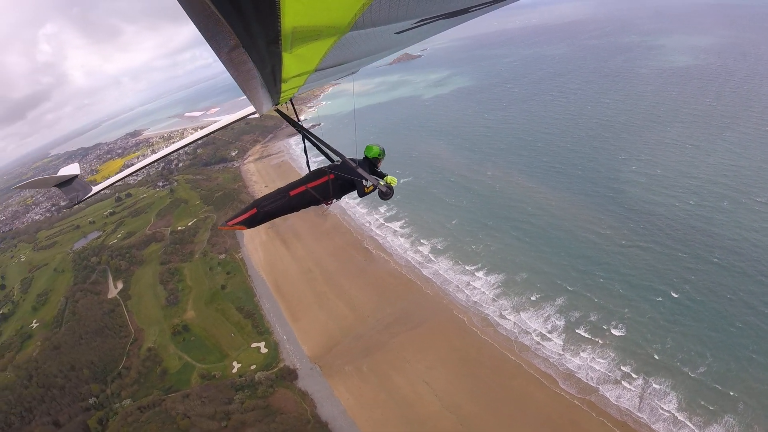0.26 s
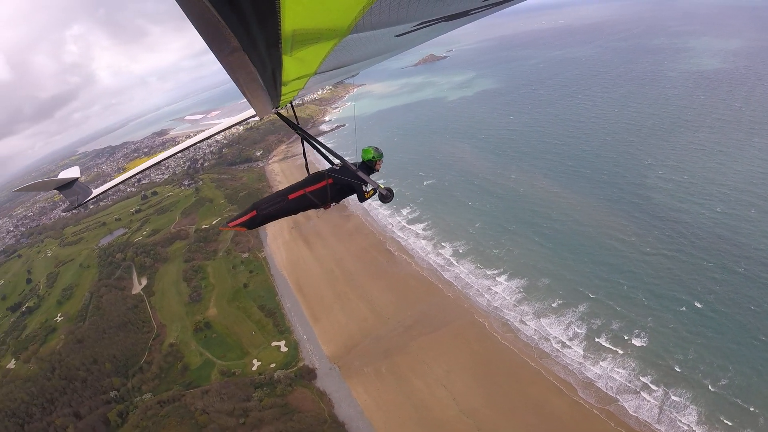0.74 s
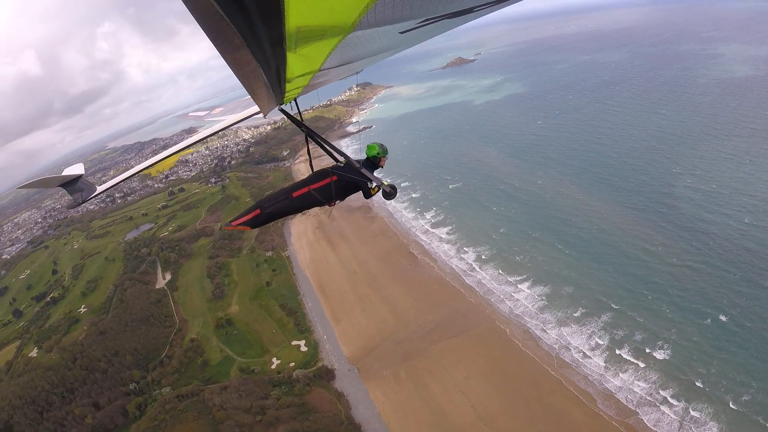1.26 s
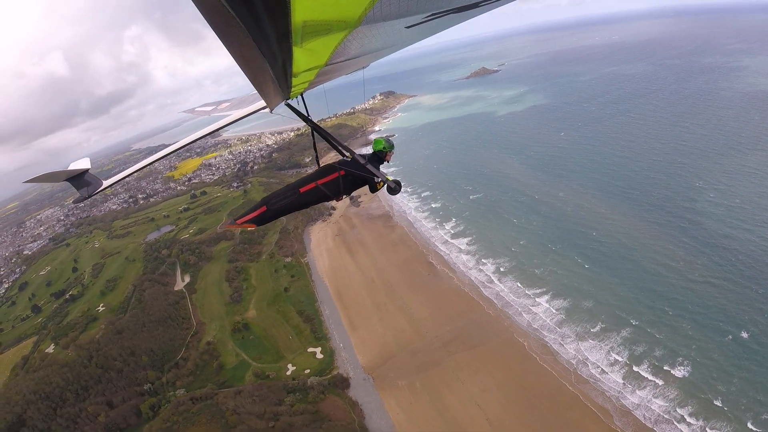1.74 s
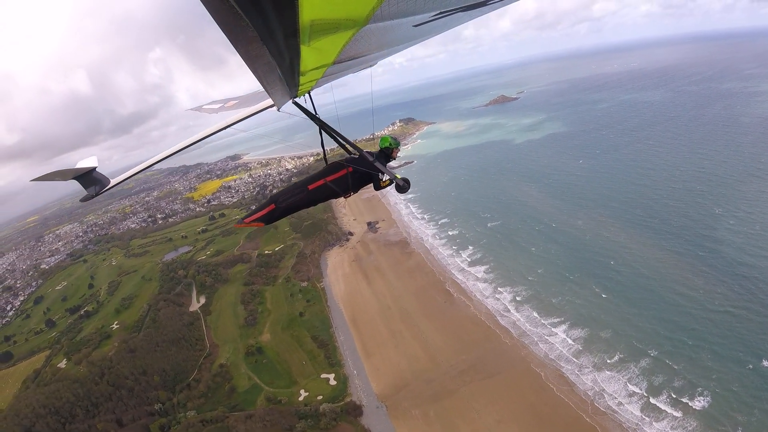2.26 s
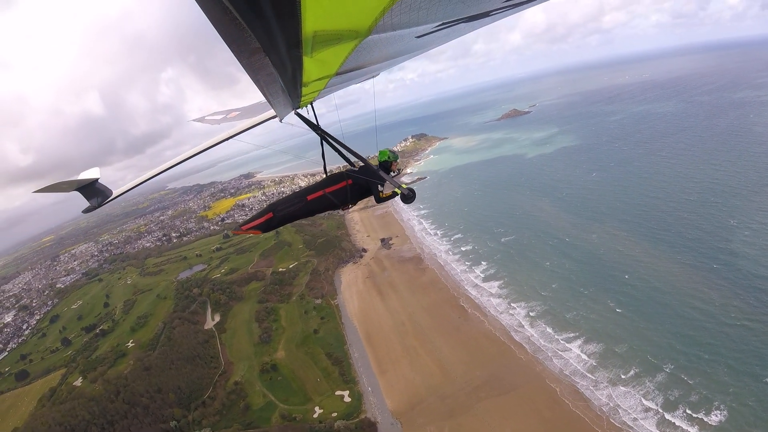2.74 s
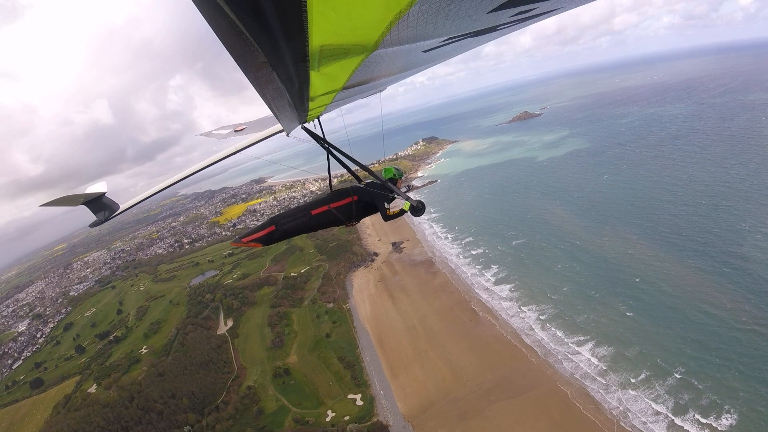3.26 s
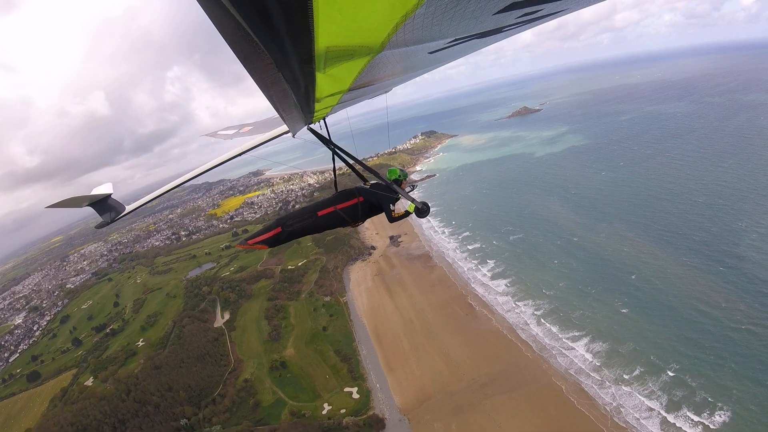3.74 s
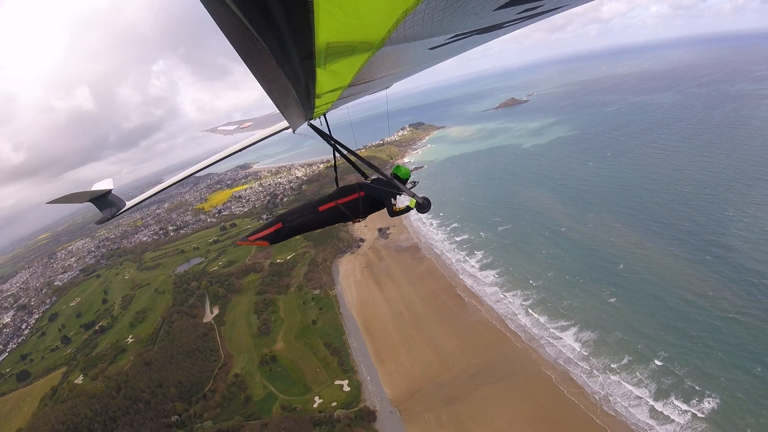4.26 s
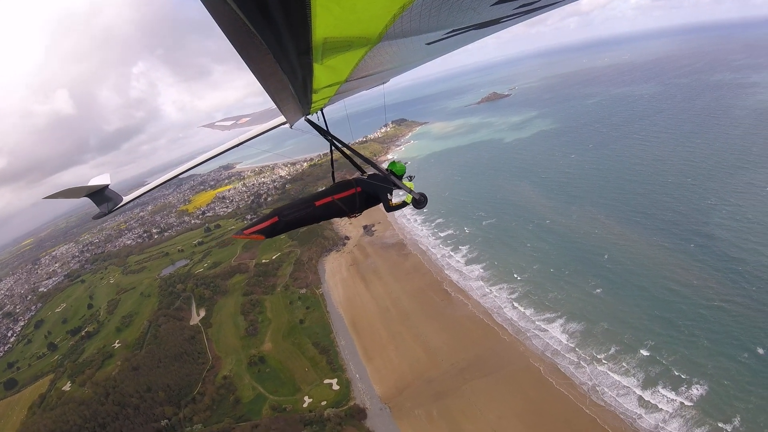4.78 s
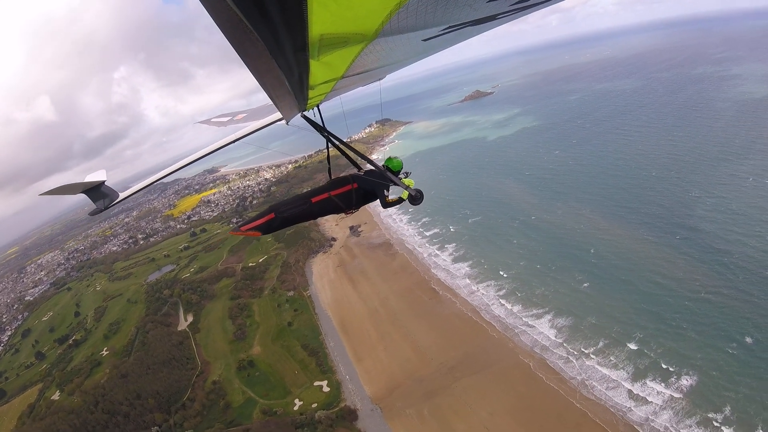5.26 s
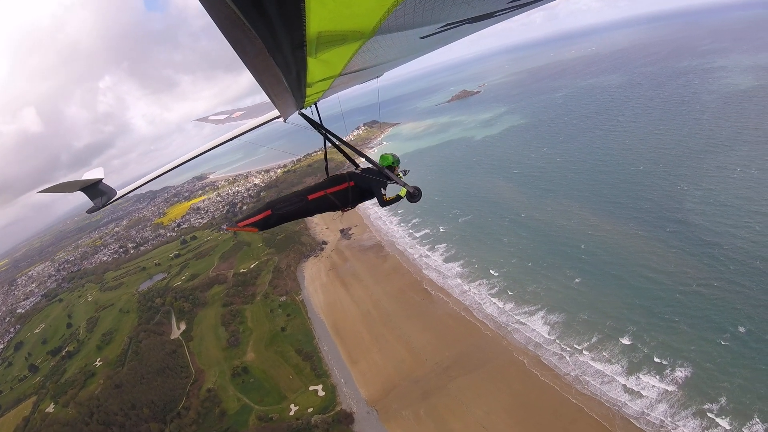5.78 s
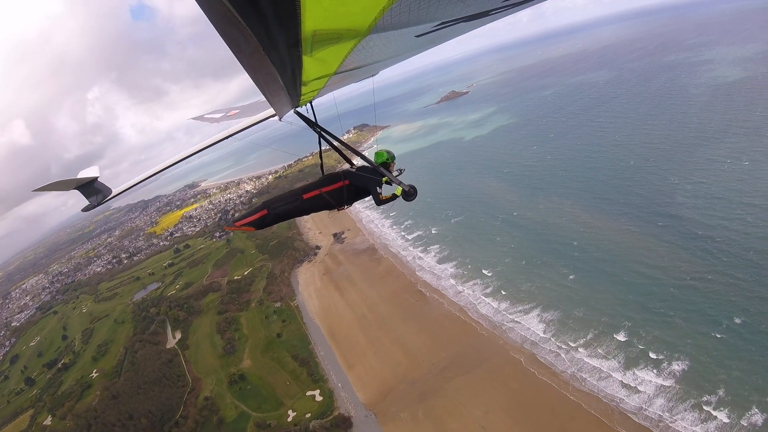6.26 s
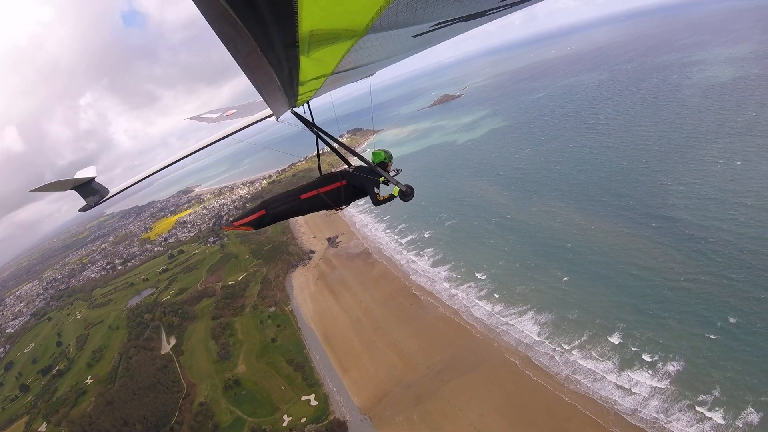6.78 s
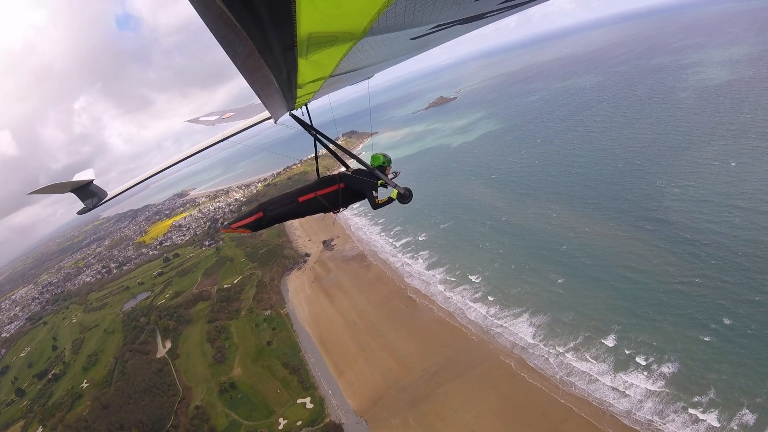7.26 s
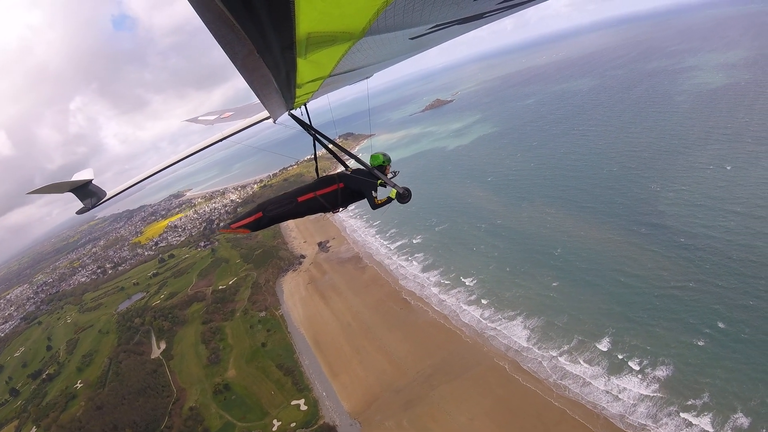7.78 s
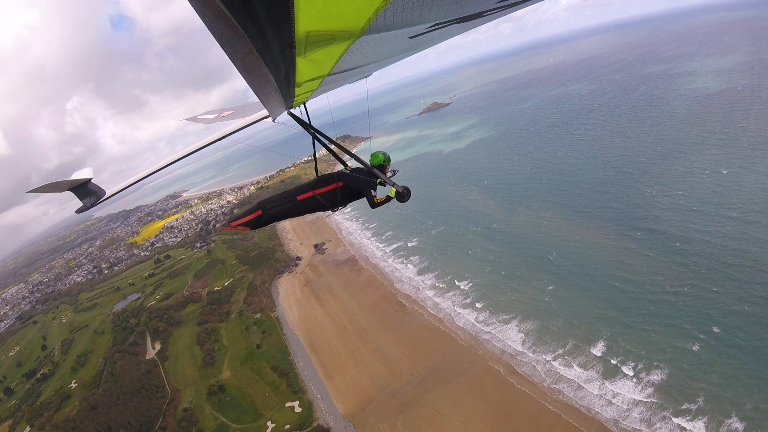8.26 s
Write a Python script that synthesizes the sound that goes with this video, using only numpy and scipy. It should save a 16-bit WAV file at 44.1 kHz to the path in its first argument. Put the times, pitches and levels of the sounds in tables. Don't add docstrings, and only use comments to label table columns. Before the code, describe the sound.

A hang glider flies high over a coast, heard from a small closed camera fixed under its wing. From 0 s to the end at about 8.5 s, a heavy bass rumble thumps unevenly and almost without pause, dense and flattened at its peaks. Lumpy buffeting and a muffled roar sit above it, then an airy rush and a thin, quiet hiss. The rush is strongest around 1 to 1.8 s, drops from about 2.5 s, and is softest near 4.6 to 5.2 s, before partly rising again. Roar and buffeting swell after about 3.3 s and stay fuller later. Dry mount ticks, soft knocks and faint crackle are busiest from 1 to 2.5 s, with a sharp bright snap near 2.5 s, then become sparser and duller. Close, mono, without reverberation.

```python
import sys
import numpy as np
from scipy import signal
from scipy.fft import next_fast_len
from scipy.io import wavfile
from scipy.ndimage import uniform_filter1d, minimum_filter1d

SR = 44100
rng = np.random.default_rng(int(sys.argv[2]) if len(sys.argv) > 2 else 0)


def invert_db(x):
    u = np.asarray(x, float) / 20
    return 10 ** u


def bounce(signal):
    frames = np.transpose(np.atleast_2d(signal))
    limited = np.clip(frames, -1, 1)
    pcm = np.round(limited * 32767).astype(np.int16)
    wavfile.write(sys.argv[1], SR, pcm)


N = 375732


def evened(x):
    return x / np.sqrt(np.mean(x ** 2) + 1e-20)


def spectrum_at(points, hz):
    f, value = np.transpose(points)
    return np.interp(np.log(hz + 1), np.log(f + 1), value)


def flight_gain(law):
    # t/s, airspeed as fine-turbulence level/dB, side slip [0-1]
    flight = [(0.0, -1, 0), (0.5, 0, 0.2), (1.0, 1, 0.5), (1.4, 1, .1), (1.7, 1.5, 0.3), (2.05, -1.5, 0.01),
              (2.4, -1, 0.14), (2.7, -4, 0), (3.05, -6.5, .3), (3.45, -6, 0.8), (3.9, -7, 0.8),
              (4.6, -9, 0.38), (5.2, -8.5, 0.8), (5.7, -7, 0.9), (6.3, -6, 1), (6.9, -5, .95),
              (7.6, -6, .8), (8.52, -4.5, 0.7)]
    level_db, per_speed, slip_db, gusty_db = law
    s, speed_db, slip = np.transpose(flight)
    course_db = np.interp(np.arange(N) / SR, s, per_speed * speed_db + slip_db * slip)
    gust_span = round(0.067 * SR)
    gusts = uniform_filter1d(rng.standard_normal(N), gust_span)
    gusts = evened(uniform_filter1d(gusts, gust_span))
    return invert_db(level_db + course_db + gusty_db * gusts)


def turbulence(colour, size, patchy_db, patch_hz, patch_s, flicker_db):
    hop = size // 4
    hz = np.fft.rfftfreq(size, 1 / SR)
    real, imag, patches = rng.standard_normal((N // hop + 5, len(hz), 3)).T
    wide = max(1, round(patch_hz * size / SR))
    long = max(1, round(patch_s * SR / hop))
    patches = uniform_filter1d(patches, wide, 0)
    patches = evened(uniform_filter1d(patches, long, 1))
    flicker = evened(uniform_filter1d(rng.standard_normal(real.shape[1]), size=3))
    shape_db = spectrum_at(colour, hz)[:, None] + patchy_db * patches + flicker_db * flicker
    z = (real + 1j * imag) * invert_db(shape_db)
    return evened(signal.istft(z, nperseg=size, noverlap=size - hop)[1][:N])


def rumble():
    # f/Hz, level/dB per Hz
    rumble_colour = [(9, -38.5), (15, -13), (25, -7), (40, -4.5), (60, 1.05), (80, 0.16), (110, -1.1),
                     (133, -1.1), (146, -10.5), (162, -14), (200, -45), (300, -100)]
    rumble_law = (-10.5, 0.03, 0, 1.5)
    noise = turbulence(rumble_colour, size=4096, patchy_db=0.54, patch_hz=30, patch_s=0.1, flicker_db=-0.5)
    return flight_gain(rumble_law) * noise


def buffet():
    # f/Hz, level/dB per Hz
    buffet_colour = [(91, -28.5), (155, -4.5), (177, 2), (386, -11.5), (420, -13.5), (550, -34),
                     (920, -120)]
    buffet_law = (-22, .5, 2.5, 1)
    noise = turbulence(buffet_colour, size=2048, patchy_db=0.97, patch_hz=120, patch_s=0.07, flicker_db=-1.5)
    return flight_gain(buffet_law) * noise


def roar():
    # f/Hz, level/dB per Hz
    roar_colour = [(240, -36), (410, -6), (443, 0), (621, 0), (1300, -13), (1690, -44), (2860, -120)]
    roar_law = (-31.5, 0.21, 6, 1)
    noise = turbulence(roar_colour, size=1024, patchy_db=0.5, patch_hz=250, patch_s=0.087, flicker_db=1.3)
    return flight_gain(roar_law) * noise


def rush():
    # f/Hz, level/dB per Hz
    rush_colour = [(500, -32), (760, -1), (1060, 1), (1400, -0.5), (1910, -5.5), (2500, -13), (3050, -19.5),
                   (3960, -32.5), (4600, -37), (5200, -52), (7000, -100)]
    rush_law = (-27.5, 0.825, -0.8, 0.18)
    noise = turbulence(rush_colour, size=512, patchy_db=0.36, patch_hz=700, patch_s=0.03, flicker_db=0.94)
    return flight_gain(rush_law) * noise


def port_hiss():
    # f/Hz, level/dB per Hz
    port_colour = [(1800, -25.5), (2800, -2.5), (3500, -6.5), (4200, -8.5), (4750, -13), (5050, -4),
                   (5400, -4), (5850, 0), (6500, -3.5), (7500, -6.5), (8000, -11), (10300, -26),
                   (12300, -41), (16500, -89)]
    hiss_law = (-44, 1.05, 0.05, 0.48)
    noise = turbulence(port_colour, size=512, patchy_db=0.5, patch_hz=1510, patch_s=0.024, flicker_db=-0.4)
    return flight_gain(hiss_law) * noise


def ring(hz, length_s):
    t = np.arange(round(length_s * SR)) / SR
    return np.hanning(len(t)) * np.sin(2 * np.pi * hz * t)


def add_centred(mix, s, length_s, sound):
    part = mix[round((s - length_s / 2) * SR):][:len(sound)]
    part += sound[:len(part)]


def add_slip(mix, s, bracket_db, port_db, port_hz):
    bracket_s, shell_s, port_s = 0.0018, 0.0016, 0.0013
    snap = np.clip(1.5 + (port_db - bracket_db) / 10, 0, 1)
    dull_hz, bright_hz = 3240, 3800
    shell_hz = dull_hz + snap * (bright_hz - dull_hz)
    shell_db = max(bracket_db - 7, min(port_db, -24) - 3)
    port = ring(port_hz, port_s) + invert_db(-20.5) * ring(1.4 * port_hz, port_s)
    add_centred(mix, s, bracket_s, invert_db(bracket_db) * ring(2460, bracket_s))
    add_centred(mix, s, shell_s, invert_db(shell_db) * ring(shell_hz, shell_s))
    add_centred(mix, s, port_s, invert_db(port_db) * port)


def crackle(slip_hz, db):
    ring_s = 0.0016
    strength = invert_db(db + 3.9 * np.minimum(rng.exponential(1, N), 2))
    slips = strength * (rng.random(N) < 14 / SR)
    slips = slips * flight_gain((9.0, 1.8, -4.0, 1.5))
    click = ring(slip_hz, ring_s) + invert_db(-14.0) * ring(6200, ring_s)
    return signal.oaconvolve(slips, click)[:N]


def mount():
    # t/s, bracket ring peak level/dB, port ring peak level/dB, port ring f/Hz
    ticks = [(0.25, -23, -45, 6800), (0.9118, -24, -38, 6500), (1.0655, -17, -28, 5240),
             (1.0807, -21, -23, 6700), (1.1324, -26, -41, 5200), (1.1484, -23, -43, 7800),
             (1.2584, -26, -32, 6800), (1.3315, -50, -27, 5230), (1.538, -22, -23, 5200),
             (1.608, -45, -24, 6800), (1.614, -49, -23, 5600), (1.6447, -20, -21, 5260),
             (1.7886, -32, -25, 6000), (2.0116, -48, -29, 5200), (2.2639, -19, -29, 7160),
             (2.3315, -34, -29.5, 5400), (2.5186, -21.5, -12, 6220), (2.526, -24, -50.5, 7800),
             (2.848, -23, -31, 5170), (3.0344, -23, -31, 6450), (3.4648, -25.5, -41, 6400),
             (3.6628, -24, -45, 5230), (4.155, -25, -26, 5800), (4.5932, -29, -35, 5200),
             (4.8828, -24, -30.5, 5740), (5.2726, -29, -39, 6400), (5.9122, -25, -47, 7800),
             (6.4698, -26.5, -55, 6400), (7.609, -25, -45, 6800), (8.1166, -27, -50, 5200)]
    # t/s, bracket ring peak level/dB
    knocks = [(0.1027, -33), (1.0934, -24), (1.1871, -23), (1.3918, -25), (1.5061, -25), (1.654, -26),
              (1.6771, -25), (2.0678, -26), (3.2311, -28), (3.341, -27), (3.5336, -32), (3.562, -32),
              (3.7293, -31), (3.7868, -32), (3.9388, -28), (4.1168, -29), (4.2687, -31), (4.7841, -33),
              (5.0091, -34), (5.5206, -34), (5.776, -36), (5.9846, -31), (6.0215, -31), (6.4816, -30),
              (6.8145, -31), (7.9206, -30), (8.068, -33), (8.3776, -31)]
    out = np.zeros(N)
    for s, bracket_db, port_db, port_hz in ticks:
        add_slip(out, s, bracket_db, port_db, port_hz)
    for s, bracket_db in knocks:
        add_slip(out, s, bracket_db, bracket_db - 14.5, 6200)
    for slip_hz, db in ((2400, -40), (3200, -42.5), (3800, -52)):
        out = out + crackle(slip_hz, db)
    notch_hz, notch_width_hz = 4700, 630
    return signal.lfilter(*signal.iirnotch(notch_hz, notch_hz / notch_width_hz, fs=SR), out)


def scene():
    wind = rumble() + buffet() + roar() + rush() + port_hiss()
    return (wind + mount())[None]


def low_pass(x):
    return signal.sosfilt(signal.butter(12, 15700, fs=SR, output="sos"), x)


def record(dry):
    split = signal.butter(4, 190, fs=SR, output="sos")
    bass = signal.sosfiltfilt(split, dry)
    swing = abs(signal.hilbert(bass, next_fast_len(N))[:, :N])
    swing = uniform_filter1d(swing, round(0.0063 * SR))
    limited = bass / (1 + (swing / invert_db(-4.0)) ** 6.5) ** (1 / 4.3)
    held = dry - bass + signal.sosfiltfilt(split, limited)
    peak = -minimum_filter1d(-abs(held), size=301)
    peak = uniform_filter1d(peak, size=301)
    held = held / np.maximum(peak / invert_db(-2.4), 1)
    self_noise = invert_db(-82) * rng.standard_normal(held.shape)
    mix = held + 0.0015 + self_noise
    return low_pass(mix)


dry = scene()
out = record(dry)
bounce(out)
```